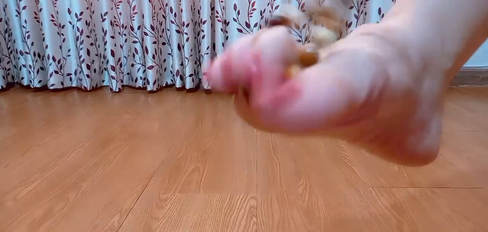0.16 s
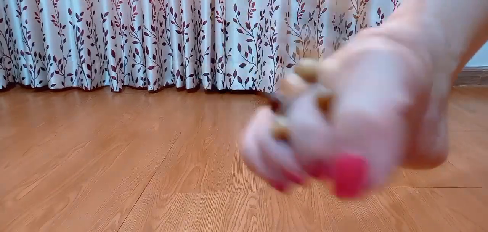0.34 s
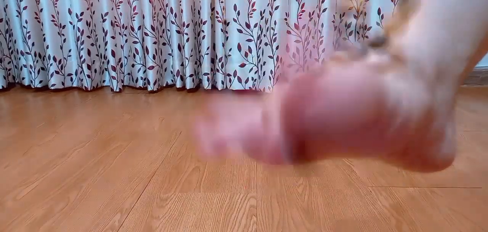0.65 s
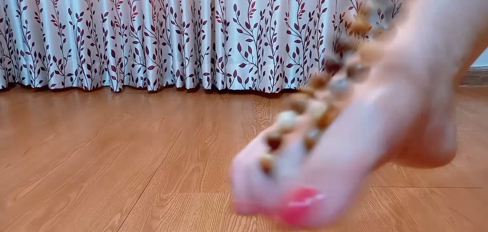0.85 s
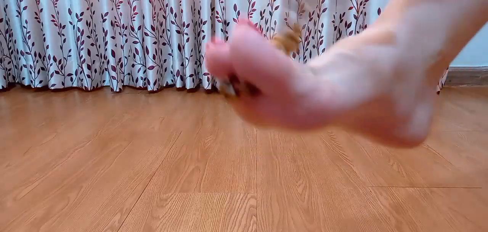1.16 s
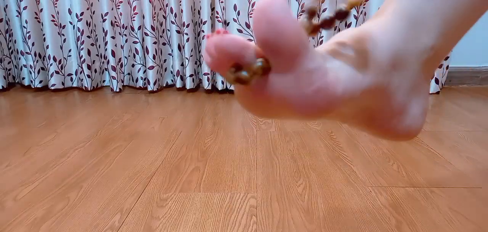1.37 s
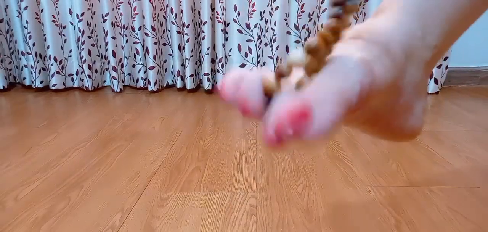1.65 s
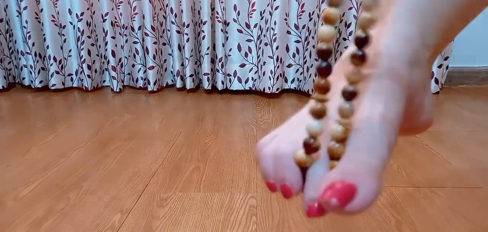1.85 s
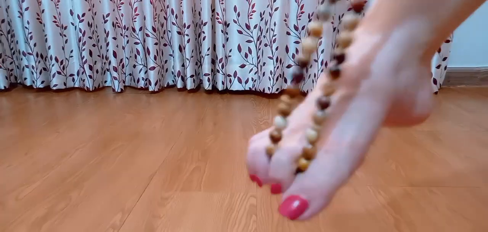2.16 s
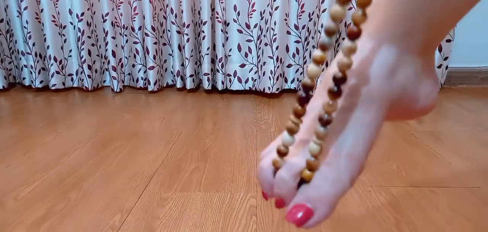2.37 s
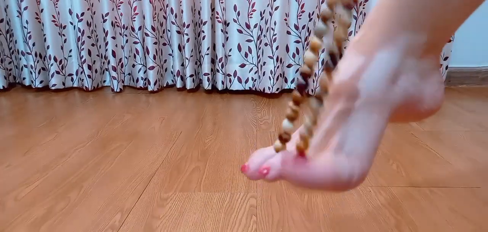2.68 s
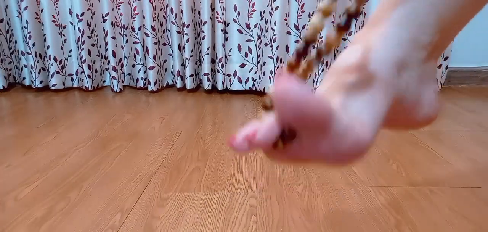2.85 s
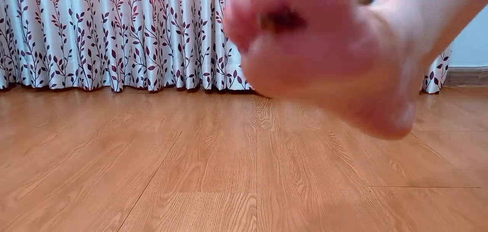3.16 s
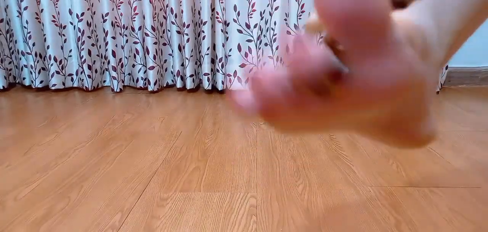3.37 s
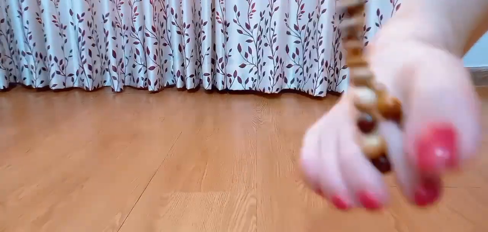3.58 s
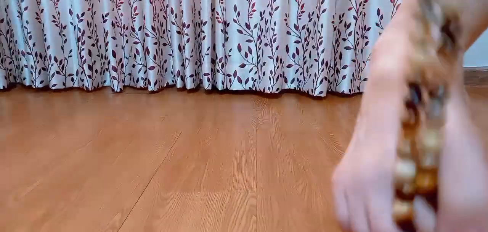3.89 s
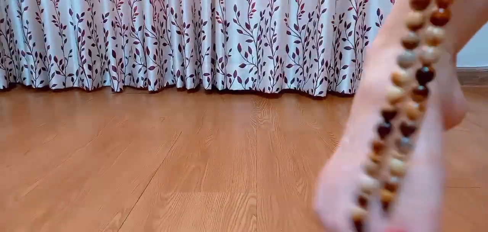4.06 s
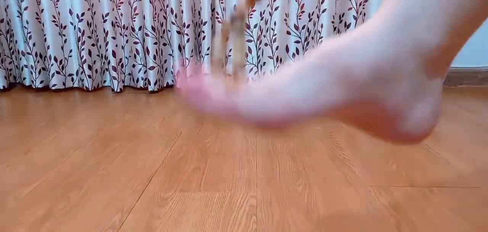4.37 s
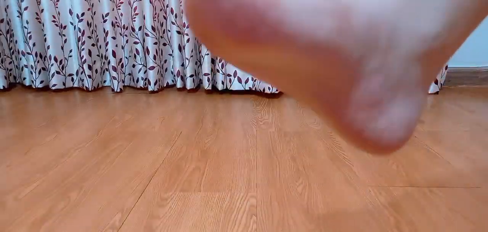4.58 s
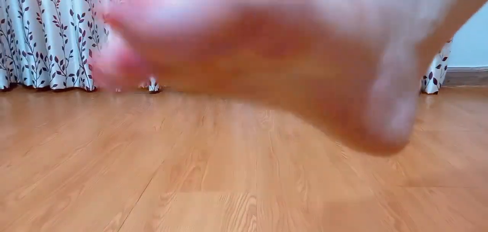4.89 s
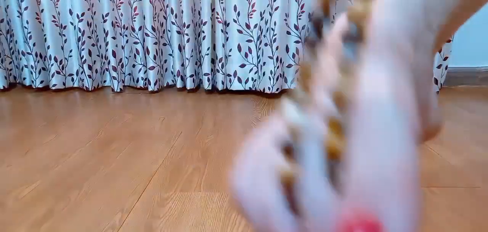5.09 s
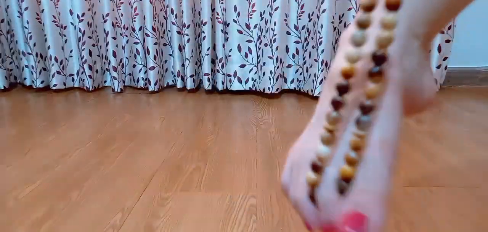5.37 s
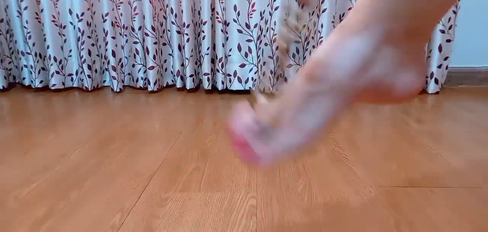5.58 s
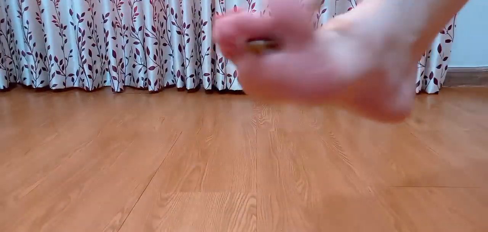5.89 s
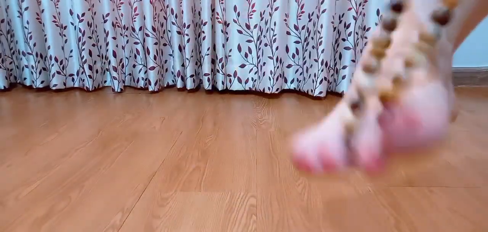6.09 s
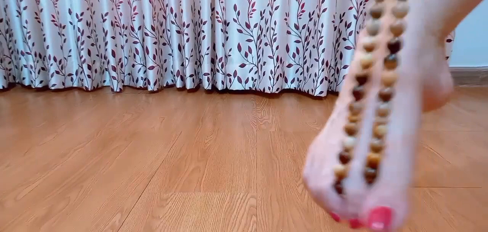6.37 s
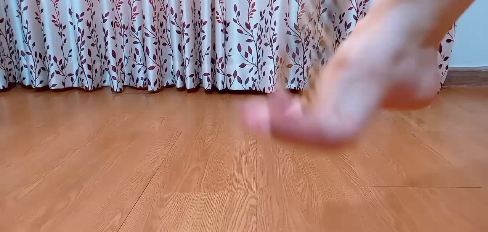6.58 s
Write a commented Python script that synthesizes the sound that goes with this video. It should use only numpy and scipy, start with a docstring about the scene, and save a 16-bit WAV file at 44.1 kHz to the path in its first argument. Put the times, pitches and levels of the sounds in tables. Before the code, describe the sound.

A string of hard beads is shaken by a foot very close to a small microphone in a quiet room. Crisp, bright clicks start at once, crowd into loud clattering bursts over the first second and a half, then thin out. A softer rattle with a dull bump follows, then scattered faint ticks, a sharp triple clack, and a last bright rattle near the end, over low rumble and faint hiss.

```python
"""Rattling beads on a wooden floor

A string of hard round beads, shaken by a foot close to a small microphone, clicks and rattles
in a quiet room. Each click is a very short burst with its own colour; rebounds, pile-ups and
chatter are many such bursts. Echoes and a room tail follow, dull bumps join in, and rumble and
hiss (shaped noise) lie below. A peak limiter ducks everything around the loudest clicks."""
import sys
import numpy as np
from scipy import signal
from scipy.io import wavfile
from scipy.ndimage import uniform_filter1d, minimum_filter1d

SR = 44100
rng = np.random.default_rng(int(sys.argv[2]) if len(sys.argv) > 2 else 0)


def undo_db(level):
    """Turn decibels back into plain size, where 20 dB means ten times bigger."""
    steps = np.asarray(level, float) / 20
    return 10 ** steps


def persist_wave(psi):
    """Save psi, clipped to +-1, as 16-bit WAV."""
    counts = np.round(np.clip(psi, -1, 1) * 32767).astype(np.int16)
    wavfile.write(sys.argv[1], SR, np.atleast_2d(counts).T)


N = 297234  # length in samples

# All levels below are those ahead of the limiter.
# knocks of bead on bead that stand out: t/s, peak level/dB, brightness above 10 kHz/dB, body below 5 kHz/dB
STANDOUT_KNOCKS = [(0.0863, -30, -1, 5), (0.0895, -17.5, -1, -5), (.144, -31, -7, -9),
                   (.1474, -12.5, 1, 4.5), (0.1515, -12, -5, -6), (0.1874, -15.5, -7, -2),
                   (.1906, -18.5, -10, -2.5), (.1979, -27, -10, 4), (.3521, -31.5, 2, 6),
                   (.3802, -32, -8, -5), (0.3948, -14.5, -21, -1), (0.4048, 2.5, -2, -8),
                   (.4114, -24, -8, -3), (.4196, -25, -6, -5), (.426, -13, -3, -6), (.4324, -18, -7, -4),
                   (0.4573, -25, -8, 1), (0.4725, -6, -3.5, -3), (0.4754, -13.5, -8, 2), (.482, -32, -8, 1),
                   (.5567, -16.5, -3, -4), (0.5599, -15, -4, 1), (0.5755, -25.5, -4, -3),
                   (0.5786, -21, -1, 0), (.62, -16, -26, -12), (0.629, -26, -28, 14), (.6625, -24, -1, -1),
                   (.6703, -31, 0, 3), (.7352, -25, -10, 1), (0.7437, -20.5, -8, 0),
                   (.7503, -11, -13.5, -9), (0.769, -26, -14, 9), (0.7757, -1, -4.5, -3),
                   (.781, -12, -3, -4), (.7883, -15, 1, -5), (.7964, 6, -2, -2), (0.8761, 2, 5, -3),
                   (.8791, -6, -3, -8), (.9283, 5.5, 0, -4.5), (0.9407, -2, -3, -2), (.943, -14, -8, -1),
                   (1.0839, 3.5, 3, -7), (1.0843, -1.5, 4, -3), (1.0918, 2.5, -2, -8), (1.1402, -17, 3, 3),
                   (1.1437, -10.5, 3, 0), (1.151, -20, 1, 1), (1.1706, -9, -3.5, -7), (1.174, -13.5, -3, 2),
                   (1.1833, -21, 5, 6), (1.2407, -7, 1, -8), (1.2454, -14, -2, -6), (1.2532, -9, 1, -7),
                   (1.2582, -20, 3, -4), (1.2604, -10, 10, 4), (1.2636, -9, 6, 4), (1.2674, 0, -2, -3),
                   (1.29, -13, -2, 2), (1.2964, -10, -12, -9), (1.2987, -6.5, -10, -0.5),
                   (1.302, -16, -10, -6), (1.3223, -3, 0, 1), (1.4295, -29, -14, -9),
                   (1.4563, -29, -15, -7), (1.5029, -33, -6, 15), (1.6062, -12, -0.5, -4.5),
                   (1.6356, -27, -7, 3), (1.6423, -16.5, 0, 1), (1.6555, -13, -3.5, -2.5),
                   (1.7322, -36.5, -16, 1), (1.8271, -32.5, -14, -1), (1.8743, -11, -3, -6),
                   (1.8768, -16.5, -1, -1), (1.883, -22, -6, -3), (2.0119, -22, 6, 8),
                   (2.0145, -17, 0.5, -4), (2.1435, -36, -21, 3), (2.6049, -25, -9, 4), (2.6294, -32, 8, 5),
                   (2.6636, -22.5, -10, 8), (2.666, -18, 0, 11), (2.687, -24, -1, 9), (2.698, -26, -2, 6),
                   (2.7168, -16.5, 3, -3), (2.8536, -26, -7, -13), (2.929, -38, -10, 7),
                   (2.9745, -20, -2, -8), (2.9766, -24, -8, -2), (3.003, -31, -14, 0),
                   (3.0875, -38, -10, 5), (3.2168, -21.5, -14, -10), (3.2326, -31.5, -7, 8),
                   (3.4383, -17.5, -7.5, 1.5), (3.453, -31, -6, 6), (3.528, -34, -3, 5),
                   (3.5557, -32, -9, 6), (3.7229, -43, -14, 4), (3.744, -31, -37, -4), (3.9, -39, -19, 2),
                   (3.9377, -38, -10, 9), (4.0055, -20.5, -7, -6), (4.013, -29, -2, 8),
                   (4.3226, -25.5, -5, 4), (4.3623, -33, -22, 8), (4.411, -28, -9, -1),
                   (4.4851, -35, -9, -9), (4.5173, -29.5, -14, -5), (4.5798, -6, -10, -4.5),
                   (4.589, -8, -4, 0), (4.599, -6, -2, -2.5), (4.6798, -21, -2, -9), (4.688, -18, -7, -2),
                   (4.7264, -30, -13, 0), (4.8259, -30.5, -13, -5), (5.0022, -33.5, -21, 1),
                   (5.081, -32, -15, -1), (5.2302, -28.5, -8, -1), (5.867, -30.5, -20, 3),
                   (6.0982, -27, -25, 6), (6.146, -31.5, -22, 5), (6.1807, -38, -11, 11),
                   (6.2233, -39, -10, 4), (6.2525, -16, 2, -10), (6.288, -17, 1, 0), (6.327, -25, -7, 5),
                   (6.397, -42, -12, 7), (6.677, -33, -8, 9)]
# colour of a knock through the microphone port, which rings near 8 kHz: f/Hz, relative level per Hz/dB
KNOCK_COLOUR = [(900, -53), (1600, -26), (2400, -22), (4340, -14), (5600, -11), (6700, -8), (7950, 1.5),
                (8900, -9.5), (10000, -12.5), (12400, -3), (14600, -3), (15800, -5), (16400, -22),
                (17000, -41.5)]
# runs of beads slamming together: start t/s, length/s, peak level/dB (the highest, before the spread),
# brightness/dB, body/dB
PILEUP_RUNS = [(0.152, .011, -20.5, -3, 4), (.7942, .005, -4.5, 6, -1.5), (.806, .004, -2, 3, -2),
               (.8757, .006, -8, -1.5, -4), (0.925, .003, -11, 5, -8), (0.9393, .005, -11, -3, 1),
               (1.083, .004, -12, -1, -11), (1.2646, .006, -4, 4, -12), (2.63, .008, -17.5, -0.5, 5.5),
               (2.718, .006, -24, -1, 12), (6.2525, 0.0029, 0.5, 2, -10.5), (6.256, 0.0085, -11, 11, -5),
               (6.2772, .0035, -5.5, 8, -2.5)]
# stretches where the string keeps chattering after a jolt: start t/s, end t/s, typical peak level/dB,
# brightness/dB
CHATTER_STRETCHES = [(0.144, 0.203, -39, 2), (0.434, 0.492, -45, -3), (0.561, 0.67, -51, -12),
                     (0.789, 0.865, -25.5, 3), (0.878, 0.92, -34, 2), (0.933, 0.997, -62, 6),
                     (1.085, 1.195, -38, -4), (1.251, 1.364, -37, -5), (1.61, 1.672, -53, -13),
                     (2.617, 2.784, -40.5, -6.5), (4.607, 4.675, -38.5, -4), (6.261, 6.351, -33, -2)]
# duller bumps as the string meets the foot: t/s, level before fading/dB, f/Hz, time to fade by 60 dB/s
FOOT_BUMPS = [(2.714, -20, 141.3, 0.047), (3.216, -42.5, 1650, 0.021)]
# mirror images of the beads in floor and foot: delay/s, level/dB
NEAR_ECHOES = [(.0024, -15), (.0049, -35.5), (.0075, -17.5)]
# how long the room rings: f/Hz, time to fade by 60 dB/s
ROOM_FADE = [(2000, 0.54), (5000, 0.2), (8000, 0.21), (14000, 0.19)]
# colour of the building's rumble: f/Hz, relative level per Hz/dB
RUMBLE_COLOUR = [(24, -62), (38, -43), (58, -13), (95, 0.5), (152, -3.5), (191, -7), (290, -10.5),
                 (400, -17), (725, -24), (1100, -30), (2250, -43.5), (4000, -57)]
# colour of the hiss of air and microphone, shaped by the port: f/Hz, relative level per Hz/dB
HISS_COLOUR = [(500, -1), (1500, 6), (2300, 2.5), (6000, -3.5), (7200, -5), (7950, -2.5), (8560, -9),
               (9100, -28), (10200, -16.5), (12600, -1), (15100, 0.5), (15900, -6), (16500, -5)]
# slow drift of the background: t/s, rumble level/dB, hiss level/dB
BACKGROUND_DRIFT = [(0.0, -43.5, -57), (0.5, -46, -57), (0.82, -44.5, -61), (1.2, -47.5, -58.5),
                    (1.74, -46.5, -59), (2.381, -48.5, -62.5), (2.61, -42.5, -57), (3.0, -46, -59),
                    (3.3, -42.5, -58), (3.9, -46, -58.5), (4.13, -42.5, -59), (4.52, -46, -57.5),
                    (5.609, -43.5, -59), (6.74, -43.5, -58.5)]

REBOUND_WAIT_S, REBOUND_DB, REBOUND_SPREAD_DB = 0.002, -19, 3  # typical wait; level change; extra drop
PILEUP_SPREAD_DB, PILEUP_COLOUR_DB = 12, 3  # ranges of the random level and colour
TICKS_PER_S, FAINTEST_TICK_DB = 7.2, -53
CHATTER_PER_S, CHATTER_FADE_DB_PER_S = 2200, 45
SETTLE_S, SETTLE_DB = 0.025, 5.5  # extra fade at the end of a chatter stretch
ROOM_DB = -11  # level of the room tail
CEILING_DB, LOOKAHEAD_S, RECOVERY_DB_PER_S = -6, 0.011, 114  # limiter


def beads():
    """The listed knocks, two random rebounds after each among the next beads, pile-ups and faint ticks."""
    listed = np.array(STANDOUT_KNOCKS)
    wait, drop = rng.random((len(listed), 2, 2)).T
    delay = -REBOUND_WAIT_S * np.log(wait + 1e-3)
    level_change = REBOUND_DB - REBOUND_SPREAD_DB * drop
    change = np.array([delay, level_change, 0 * wait, 0 * wait])  # the colour stays
    rebounds = (listed.T[:, None] + change).reshape(len(change), -1)
    s, *tone = np.concatenate([listed.T, rebounds, pileups()], axis=1)
    gap = np.sort(abs(listed[:, 0] - s[:, None]), axis=1)
    gap = np.where(gap[:, 0] > 0, gap[:, 0], gap[:, 1])  # to the nearest other listed knock
    crowding = np.exp(-(gap / 0.0024) ** 2)
    return knocks(s, *tone, crowding) + ticks()


def pileups():
    """Eight knocks spread loosely over each slam of many beads, as rows like the listed knocks."""
    start, length, db, bright_db, body_db = np.transpose(PILEUP_RUNS)
    place, size, bright, body = rng.random((len(PILEUP_RUNS), 8, 4)).T
    s = start + length * (np.arange(8)[:, None] + place) / 8
    peak_db = db - PILEUP_SPREAD_DB * size
    bright_db = bright_db + PILEUP_COLOUR_DB * (bright - 0.5)
    body_db = body_db + PILEUP_COLOUR_DB * (body - 0.5)
    rows = [s, peak_db, bright_db, body_db]
    return np.reshape(rows, (len(rows), -1))


def ticks():
    """Beads settling: faint knocks at random moments, mostly small and a few larger."""
    count = int(np.ceil(TICKS_PER_S * N / SR))
    at, size, dullness = rng.random((count, 3)).T
    peak_db = FAINTEST_TICK_DB - 2.8 * np.log(size + 1e-3)
    return knocks(at * (N - 1) / SR, peak_db, -4 - 11 * dullness, 9.6 * dullness, 0 * at)


def knocks(s, peak_db, bright_db, body_db, crowding):
    """One click per knock: shared colour, own brightness and body, smeared by the neighbouring beads."""
    hz = abs(np.fft.fftfreq(512, 1 / SR))
    upper = 1 / (1 + np.exp((10000 - hz) / 700))
    lower = 1 / (1 + np.exp((hz - 5200) / 700))
    tone_db = bright_db[:, None] * upper + body_db[:, None] * lower
    log_gain = np.log(undo_db(read(KNOCK_COLOUR, hz) + tone_db) + 1e-5)
    # this choice of phase makes the sound start at once and then die away
    colour = np.exp(log_gain - 1j * signal.hilbert(log_gain).imag)

    # the jolt runs along the string: the more crowded the knock, the more beads answer it
    lead = 8  # samples ahead of the main hit
    lag = np.arange(-lead, 92) / SR
    fade = np.exp(-abs(lag) / (0.00026 + 0.00034 * crowding[:, None]))
    strength = 0.4 + 0.13 * crowding[:, None]
    scatter = strength * rng.standard_normal((len(s), 100)) * fade
    scatter[:, lead] = 1  # the main hit
    spread = np.fft.fft(scatter, 512)
    power = uniform_filter1d(abs(spread) ** 2, size=25, axis=1, mode="wrap")
    spread /= np.sqrt(power)  # the broad colour is kept

    shape = np.fft.ifft(colour * spread).real[:, :256]
    peak = abs(signal.hilbert(shape)).max(axis=1)
    shape *= (undo_db(peak_db) / peak)[:, None]
    first = np.maximum(np.round(s * SR).astype(int) - lead, 0)
    out = np.zeros(N + 256)
    np.add.at(out, first[:, None] + np.arange(256), shape)
    return out[:N]


def chatter():
    """Dense tiny knocks at random moments inside each stretch, slowly fading."""
    rows = []
    for start, end, db, bright_db in CHATTER_STRETCHES:
        wait, size, tone = rng.random((400, 3)).T
        s = start - np.cumsum(np.log(wait + 1e-9)) / CHATTER_PER_S
        settling = np.clip(1 - (end - s) / SETTLE_S, 0, 1)
        fade_db = CHATTER_FADE_DB_PER_S * (s - start) + SETTLE_DB * settling
        peak_db = db - 1.35 * np.log(size + 0.03) - fade_db
        tilt_db = 6 * (tone - 0.5)  # brighter knocks have less body
        stretch = np.array([s, peak_db, bright_db + tilt_db, -tilt_db, 0 * s])
        rows.append(stretch[:, s < end])
    return knocks(*np.concatenate(rows, axis=1))


def bumps():
    """The string meets the foot: one dying tone per bump, rising softly over its first cycle."""
    out = np.zeros(N)
    for s, db, hz, t60 in FOOT_BUMPS:
        t = np.maximum(np.arange(N) / SR - s, 0)
        soft_start = np.minimum(t * hz, 1)
        out += undo_db(db - 60 * t / t60) * soft_start * np.sin(2 * np.pi * hz * t)
    return out


def room(x):
    """Near echoes, then sparse taps dying band by band; three tails take turns so like knocks differ."""
    near = np.zeros(600)
    near[0] = 1  # the direct sound
    for s, db in NEAR_ECHOES:
        near[round(s * SR)] = undo_db(db)

    # one tap, up or down, at a random place in every 8 samples
    length, start = SR // 2, 60
    slots = np.arange(start, length - 8, 8)
    places = slots + rng.integers(0, 8, (3, len(slots)))
    signs = rng.choice([-1., 1.], (3, len(slots)))
    taps = np.zeros((3, length))
    np.put_along_axis(taps, places, signs, 1)
    taps *= 1 - 0.18 * np.exp(-np.arange(length) / SR / 0.0022)  # reflections from the walls build up
    hz, t, z = signal.stft(taps, SR, nperseg=128)
    fade = undo_db(-60 * t / read(ROOM_FADE, hz)[:, None])
    tails = signal.istft(z * fade, SR, nperseg=128)[1]
    tails = tails / np.linalg.norm(tails[0])

    # the tails take turns 47 times a second
    turn = 2 * np.pi * (np.arange(N) * 47 / SR + np.arange(3)[:, None] / 3)
    shared = x * np.sqrt(2 / 3) * np.cos(turn)
    far = signal.fftconvolve(shared, tails, axes=1).sum(axis=0)[:N]
    return signal.oaconvolve(x, near)[:N], undo_db(ROOM_DB) * far


def background():
    """Rumble of the building and hiss of air and microphone: shaped noise, each drifting in level."""
    s, rumble_db, hiss_db = np.transpose(BACKGROUND_DRIFT)
    t = np.arange(N) / SR
    rumble = undo_db(np.interp(t, s, rumble_db)) * noise(RUMBLE_COLOUR, patchy_db=1.4)
    hiss = undo_db(np.interp(t, s, hiss_db)) * noise(HISS_COLOUR, patchy_db=1.62)
    return rumble + hiss


def noise(spectrum, patchy_db):
    """Noise built from random short-time spectra, with patches that are a little louder or softer."""
    frames, hz = N // 512 + 5, np.fft.rfftfreq(2048, 1 / SR)
    a, b, patches = rng.standard_normal((frames, 1025, 3)).T
    patches = uniform_filter1d(patches, size=20, axis=0)  # smooth over pitch
    patches = evened(uniform_filter1d(patches, size=6, axis=1))  # smooth over time
    z = (a + 1j * b) * undo_db(read(spectrum, hz)[:, None] + patchy_db * patches)
    return evened(signal.istft(z, nperseg=2048, noverlap=1536)[1][:N])


def evened(x):
    """Scales to an average (rms) level of 1."""
    return x / np.sqrt(np.mean(x ** 2) + 1e-20)


def read(points, hz):
    """Reads a table between its points, with frequency on a log scale as in hearing."""
    f, value = np.transpose(points)
    return np.interp(np.log(hz + 1), np.log(f + 1), value)


def scene():
    """Beads in the room over the background; tail, chatter and background stop sharply near 16 kHz."""
    direct, tail = room(beads())
    steady = tail + chatter() + background()
    edge = signal.firwin(401, 15950, window=("kaiser", 8), fs=SR)  # low-pass, Hz
    return (direct + bumps() + signal.oaconvolve(steady, edge, "same"))[None]


def roll_off(x):
    """The treble ends steeply here."""
    return signal.sosfilt(signal.butter(12, 17150, fs=SR, output="sos"), x)


def record(dry):
    """The limiter sees peaks coming, lowers the gain just ahead of them and recovers steadily."""
    ahead = round(LOOKAHEAD_S * SR)
    over_db = np.maximum(20 * np.log10(abs(dry[0]) + 1e-9) - CEILING_DB, 0)
    fall = np.arange(N) * RECOVERY_DB_PER_S / SR
    held_db = np.maximum.accumulate(over_db + fall) - fall  # jumps up, then recovers
    early_db = -minimum_filter1d(-held_db, size=ahead + 1, origin=-(ahead // 2))
    cut_db = uniform_filter1d(early_db, size=ahead, origin=(ahead - 1) // 2)  # no sudden steps
    mix = dry / undo_db(cut_db)
    return roll_off(mix)


dry = scene()
out = record(dry)
persist_wave(out)
```